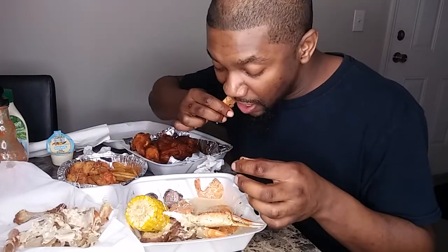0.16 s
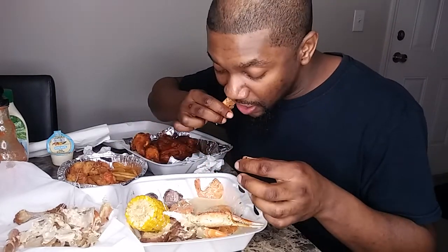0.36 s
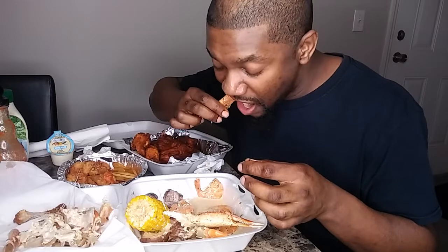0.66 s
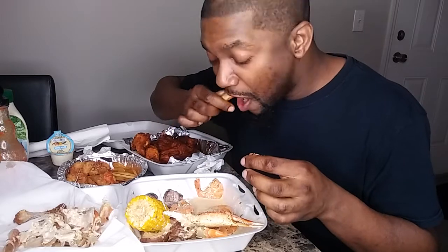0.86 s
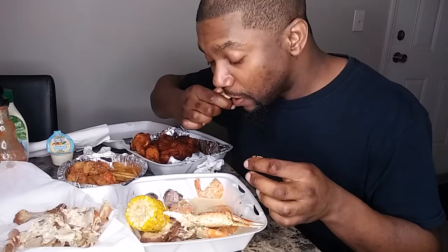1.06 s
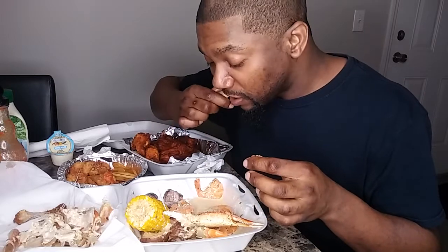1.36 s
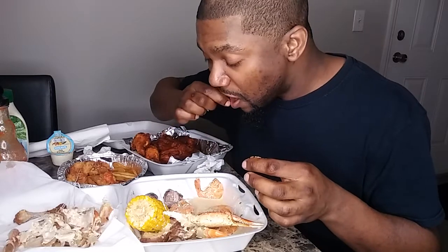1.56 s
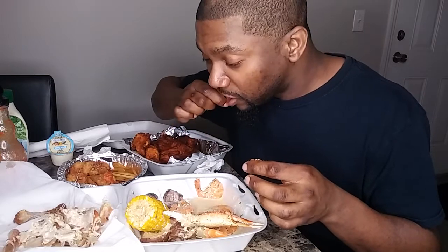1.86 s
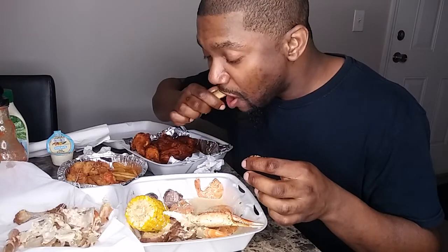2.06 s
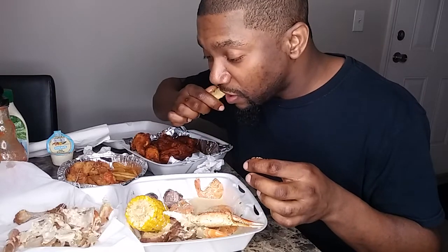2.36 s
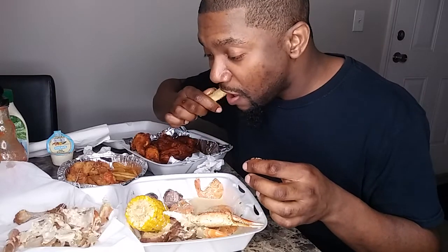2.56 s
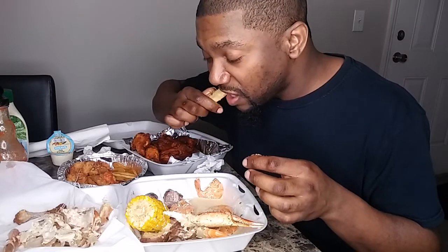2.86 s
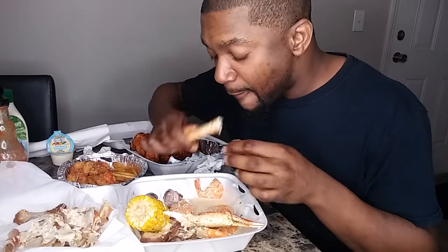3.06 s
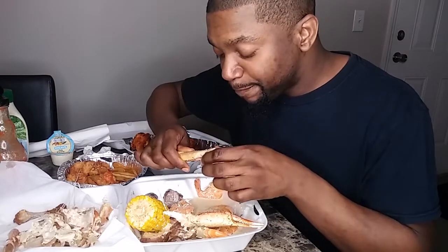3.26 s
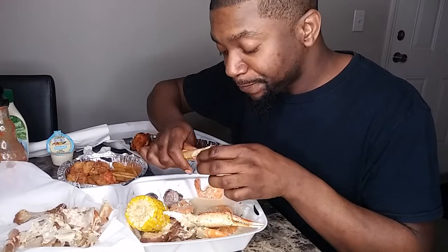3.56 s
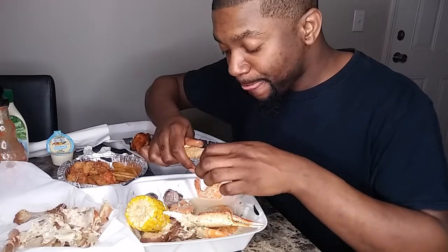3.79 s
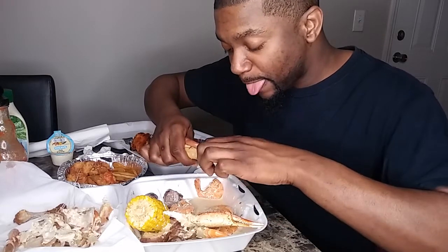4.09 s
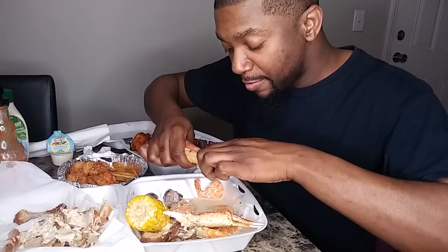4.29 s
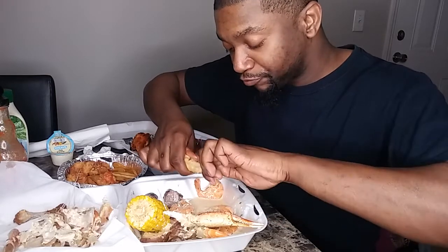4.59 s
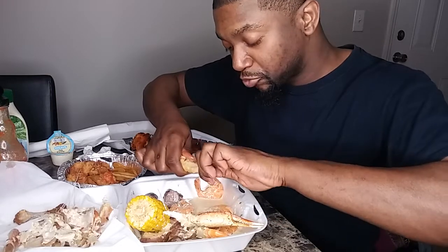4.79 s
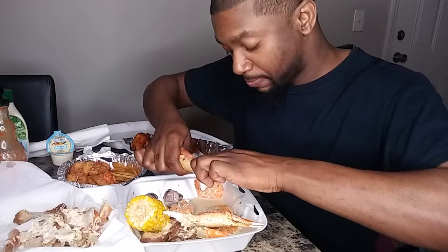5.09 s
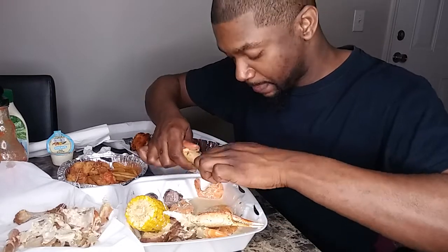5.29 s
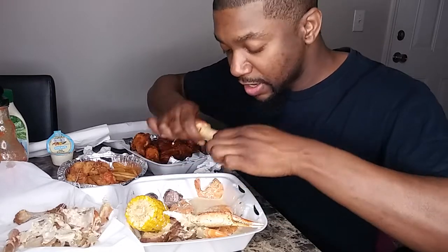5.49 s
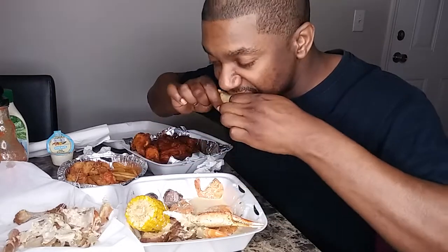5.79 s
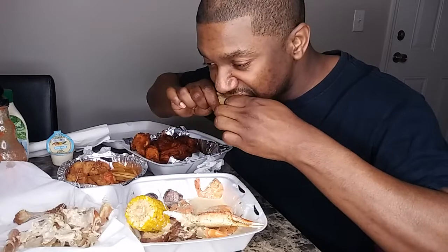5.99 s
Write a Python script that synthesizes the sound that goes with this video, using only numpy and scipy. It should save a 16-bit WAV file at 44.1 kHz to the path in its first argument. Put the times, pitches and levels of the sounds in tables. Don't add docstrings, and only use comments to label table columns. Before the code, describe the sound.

Close up in a hard-walled room, teeth tick on a crab leg, then a very loud crunch breaks its hard tip at half a second with wet pops. Sharp crackles follow after one second, near two and before three, then only faint finger clicks until small snaps near the end. Low rumble, hiss and a thin electrical whine stay behind.

```python
import sys
import numpy as np
from scipy import signal
from scipy.io import wavfile
from scipy.ndimage import uniform_filter1d

SR = 44100
rng = np.random.default_rng(int(sys.argv[2]) if len(sys.argv) > 2 else 0)


def volts_from_db(level):
    exponent = np.asarray(level, float) / 20
    return 10 ** exponent


def int16_out(signal):
    q = np.round(np.clip(np.atleast_2d(signal).T, -1, 1) * 32767)
    wavfile.write(sys.argv[1], SR, q.astype(np.int16))


N = 270774

# pitch_hz, level_db
DRONE_COLOUR = [(70, -53), (130, -4.5), (170, 0.45), (330, -3), (480, -10.5), (700, -25.5), (1500, -28.5),
                (4000, -37)]
# pitch_hz, level_db
DEEP_COLOUR = [(35, -24), (52, -48), (72, 2), (110, -7), (150, 0), (300, -54)]
# closest_s, half_length_s, drone_db, deep_db
TRAFFIC_PASSES = [
    (0.548, 0.54, -52, -63.5),
    (1.64, 0.25, -56.5, -60),
    (2.4, 0.32, -49.5, -53),
    (3.053, 0.39, -49, -60.5),
    (4.463, .2, -57, -60),
    (4.9, 0.52, -57, -55),
]
STILL_DRONE_DB, STILL_DEEP_DB = -57, -66
# pitch_hz, level_db
HISS_COLOUR = [(700, 3.4), (1500, 0), (3000, -5.5), (7500, -6.5), (8200, -11.5), (10000, -15.5),
               (15400, -8.5), (16500, -36)]
HISS_DB = -57.5
WHINE_HZ, WHINE_DB, WHINE_ON = 7710, -64, 0.69
MAINS_HZ, MAINS_START_S = 60, .0125

# delay_s, level_db
EARLY_ECHOES = [
    (.0021, -8.5),
    (.0036, -10),
    (.0062, -26),
    (0.0114, -9),
    (0.0108, -21),
    (.0138, -11),
    (.022, -11.5),
]
# pitch_hz, t60_s
ROOM_DECAY = [(500, 0.81), (1500, 0.41), (3000, 0.4), (5500, 0.4), (8000, 0.4), (13000, 0.3)]
# pitch_hz, level_db
ROOM_COLOUR = [(500, -1), (1500, 1.5), (3000, 4), (5500, 8), (7500, -1), (13000, 7)]

# start_s, mouth_hz, tube_hz, upper_tube_hz, wall_hz
GRIPS = [
    (0, 1507, 2470, 3840, 5550),
    (1.0, 1110, 2660, 3766, 5520),
    (1.75, 1214, 2500, 3510, 5420),
    (2.1, 1242, 2680, 3750, 5780),
    (2.7, 1315, 2530, 3670, 5930),
    (3.0, 1230, 2200, 3240, 5660),
    (4.5, 1290, 2230, 3040, 5500),
    (5.4, 1650, 2580, 3260, 5700),
    (6.0, 1910, 2670, 4000, 5700),
]
CAVITY_WIDTHS = [355, 410, 610, 980, 830]
UPPER_WALL_HZ, UPPER_TUBE_DB, TIP_UPPER_TUBE_DB = 7310, 7, 5
SCATTER = .022
# pitch_hz, width_hz, level_db
SPLINTER_MODES = [(10240, 1230, 7.5), (12130, 2900, 1.5), (13900, 530, -24)]
# pitch_hz, width_hz, level_db
SNAP_MODES = [(2020, 920, 0.83), (4800, 1500, 0.1)]
SNAP_DB, TIP_SNAP_DB = -10, -12.5

# start_s, wall_db, mouth_db, tube_db
BREAKS = [(.326, -16.5, -1.5, 0.5), (0.5341, 1, -7, 1), (.5412, -5, -18, -15), (0.5767, 9.5, -0.5, -10),
          (0.585, -3, -25, -5), (.59, -13, 8, -16), (1.2088, -20, -21, -7), (1.2223, -14.5, -19, -11),
          (1.2683, -7, -11, 0.5), (1.2873, -6, -22, -6), (1.3974, -2.5, -22, 0), (1.8778, -9, -37, -7),
          (2.02, -21, -13, -21), (2.2958, -14, -4, -7), (2.3662, -10, -3.5, -1), (2.8622, -14, -17, -6),
          (5.5277, -15, 4, 5.5), (6.098, -14.5, -9.5, -6)]
BREAK_FIZZ_DB, BREAK_TILT_DB = -12.5, -4
# start_s, wall_db, mouth_db, tube_db
SHATTERS = [
    (.401, -16.5, -12, -2.5),
    (0.4415, -5, -10.5, -2.5),
    (0.4562, -7, 3.5, 3.5),
    (1.1035, -24.5, -11, -3),
    (1.1981, -23, -22, -3),
    (1.9229, -21, -14, 3),
    (2.3214, -17.5, -8, 2),
    (2.3515, -4.5, -1.5, -4),
    (2.362, -19, -12, -19),
    (2.8421, -3.5, -7, -9),
]
SHATTER_FIZZ_DB, SHATTER_TILT_DB = -6.5, -2.2
# start_s, wall_db, mouth_db, tube_db
TICKS = [(0.0773, -40, 14, 6), (0.1516, -34.5, 2, 0), (0.3107, -31, -11, -1), (0.527, -39, -4, -3),
         (1.028, -32.5, 4, 2), (1.0884, -27.5, -12, -6), (1.52, -26.5, 1, 1), (1.5986, -32, 4, 0),
         (1.6329, -33.5, 6.5, 4), (1.8454, -34, -7, 7), (1.8505, -33, -5, 10.5), (2.0008, -38.5, 9, 21),
         (2.0242, -34.5, 8, 14.5), (2.1858, -31, 2, -3.5), (2.5052, -25, -20, 1), (2.595, -34, 3, 1),
         (2.7388, -30.5, -2, -3), (2.817, -27.5, -6, -1), (3.0336, -31, -20, -23), (3.214, -26, -0.5, -2.5),
         (3.2283, -29.5, 5, 0), (3.614, -43, 8, 8), (3.686, -42, 5, 6), (4.0903, -48.5, 21, 9),
         (4.2887, -30.5, -19, 3), (4.5594, -51, 1, 2), (4.6633, -42.5, -5, 17.5), (5.7145, -30, 5, 1),
         (5.7718, -30, -6, -0.5), (5.94, -32, -2, -3)]
TICK_FIZZ_DB, TICK_TILT_DB = -14.5, -5.5
# start_s, wall_db, mouth_db, tube_db, tilt_db
SPLITS = [(0.555, 7.5, -1.5, -3, 11), (1.111, -25.5, -7, -1.5, 0), (1.1774, -30, -22, -6, 16),
          (1.253, -2.5, -18, -5.5, 16), (1.278, -3, -11.5, -7, 27), (1.3678, -16, -7, -1, 0),
          (1.3913, 2.5, -21, -5, 14), (1.9132, -10, -17, -5.5, 3), (1.9342, -11, -8, -3, 24),
          (1.948, -24, -16, -14, 9), (1.955, -23, -8, -16, 5), (2.388, -11, -23, -10, 12),
          (6.062, -19.5, -18, -11, 25), (6.075, -40, -18, -17, 8)]
SPLIT_FIZZ_DB = -9.5

# start_s, pitch_hz, level_db
POPS = [(.578, 1486, 5), (.592, 1470, 0.5), (1.272, 1140, -21), (1.3, 910, -33), (1.525, 1030, -28),
        (1.605, 1070, -32), (1.64, 1030, -28), (1.925, 1133, -22.5), (1.975, 1270, -34), (2.19, 1005, -28),
        (2.598, 1134, -28), (2.725, 1250, -31.5), (2.765, 1300, -34), (2.8, 1310, -31)]
POP_WIDTH_HZ = 75
# start_s, peak_db
JAW_KNOCKS = [
    (0.5766, -29),
    (2.331, -22.5),
]
# pitch_hz, width_hz, level_db
JAW_MODES = [(440, 114, 8), (740, 140, -3.5), (970, 356, -2)]

BASS_CUT_HZ, SOFT_EDGE_HZ, LOUD_EDGE_HZ = 58, 15760, 16900
FULL_SCALE = .88


def evened(x):
    return x / np.sqrt(np.mean(x ** 2) + 1e-20)


def read(points, hz):
    f, value = np.transpose(points)
    return np.interp(np.log(hz + 1), np.log(f + 1), value)


def add(mix, s, sound):
    part = mix[round(s * SR):][:len(sound)]
    part += sound[:len(part)]


def high_pass(x, order, edge_hz):
    return signal.sosfilt(signal.butter(order, edge_hz, "high", fs=SR, output="sos"), x)


def low_pass(x, edge_hz):
    taps = signal.firwin(511, edge_hz, window=("kaiser", 9), fs=SR)
    return signal.oaconvolve(x, taps, "same")


def ring(drive, modes):
    t = np.arange(len(drive)) / SR
    body = np.zeros(len(t))
    for hz, width, db in modes:
        swell_and_die = t * np.exp(-1.55 * np.pi * width * t)
        body += volts_from_db(db) * width ** 2.76 * swell_and_die * np.sin(2 * np.pi * hz * t)
    out = signal.fftconvolve(drive, body)[:len(t)]
    return out / np.linalg.norm(out)


def haze(spectrum, patchy_db):
    hz = np.fft.rfftfreq(2048, 1 / SR)
    real, imaginary, patches = rng.standard_normal((N // 512 + 5, 1025, 3)).T
    patches = uniform_filter1d(patches, size=6, axis=0)
    patches = evened(uniform_filter1d(patches, size=8, axis=1))
    level_db = read(spectrum, hz)[:, None] + patchy_db * patches
    z = (real + 1j * imaginary) * volts_from_db(level_db)
    return evened(signal.istft(z, nperseg=2048, noverlap=1536)[1][:N])


def rumble():
    s, half, drone_db, deep_db = np.transpose(TRAFFIC_PASSES)
    near = np.exp(-((np.arange(N)[:, None] / SR - s) / half) ** 2)
    drone = np.sqrt(volts_from_db(2 * STILL_DRONE_DB) + near @ volts_from_db(2 * drone_db))
    deep = np.sqrt(volts_from_db(2 * STILL_DEEP_DB) + near @ volts_from_db(2 * deep_db))
    return drone * haze(DRONE_COLOUR, 1.64) + deep * haze(DEEP_COLOUR, 0.73)


def hiss():
    return volts_from_db(HISS_DB) * haze(HISS_COLOUR, 0.7)


def whine():
    t = np.arange(N) / SR
    cycle = (t - MAINS_START_S) * MAINS_HZ % 1
    waver_hz = 45 * evened(uniform_filter1d(rng.standard_normal(N), size=250))
    tone = np.sin(2 * np.pi * np.cumsum(WHINE_HZ + waver_hz) / SR)
    gate = uniform_filter1d(1. * (cycle < WHINE_ON), size=50)
    tick = volts_from_db(8.0) * np.exp(-cycle / 0.039) * np.diff(rng.standard_normal(N + 1))
    return volts_from_db(WHINE_DB) * (tone * gate + tick)


def room(x):
    taps = np.zeros(SR // 2)
    at = np.arange(200, len(taps) - 16, 16)
    taps[at + rng.integers(0, 16, len(at))] = rng.choice([-1., 1.], len(at))
    taps *= 1 - np.exp(-np.arange(len(taps)) / SR / 0.0025)
    hz, t, z = signal.stft(taps, SR, nperseg=256)
    fade_db = read(ROOM_COLOUR, hz)[:, None] - 60 * t / read(ROOM_DECAY, hz)[:, None]
    tail = signal.istft(z * volts_from_db(fade_db), SR, nperseg=256)[1]
    tail /= np.linalg.norm(tail)
    for s, db in EARLY_ECHOES:
        add(tail, s * rng.uniform(0.94, 1.03), volts_from_db(db) * rng.choice([-1., 1.], 1))
    return signal.fftconvolve(x, tail)[:N]


def jaw_knock(db):
    knock = ring(signal.unit_impulse(900), JAW_MODES)
    return volts_from_db(db) * knock / abs(knock).max()


def pop(hz, db):
    return volts_from_db(db) * ring(signal.unit_impulse(1800), [(hz, POP_WIDTH_HZ, 0)])


def fractures():
    rows = [(*row, BREAK_FIZZ_DB, BREAK_TILT_DB) for row in BREAKS]
    rows += [(*row, SHATTER_FIZZ_DB, SHATTER_TILT_DB) for row in SHATTERS]
    rows += [(*row, TICK_FIZZ_DB, TICK_TILT_DB) for row in TICKS]
    rows += [(*row, SPLIT_FIZZ_DB, tilt_db) for *row, tilt_db in SPLITS]
    return sorted(rows)


def crack(row, grain, detune):
    s, wall_db, mouth_db, tube_db, fizz_db, tilt_db = row
    _, *hz = [grip for grip in GRIPS if grip[0] <= s][-1]
    hz = np.array(hz + [UPPER_WALL_HZ]) * (1 + SCATTER * np.clip(detune, -1, 1))
    at_tip = s < GRIPS[1][0]
    upper = volts_from_db(TIP_UPPER_TUBE_DB if at_tip else UPPER_TUBE_DB)
    snap_level = volts_from_db(TIP_SNAP_DB if at_tip else SNAP_DB)

    fade = np.exp(-np.arange(len(grain)) / SR / 0.0018)
    snaps = signal.unit_impulse(len(grain)) + .14 * grain * fade
    cavities = [ring(snaps, [(f, width, 0)]) for f, width in zip(hz, CAVITY_WIDTHS)]
    mouth, tube, upper_tube, wall, upper_wall = cavities
    walls = (wall - volts_from_db(tilt_db) * upper_wall) / np.hypot(1, volts_from_db(tilt_db))
    tubes = (upper * upper_tube - tube) / np.hypot(1, upper)
    fizz = ring(snaps, SPLINTER_MODES)
    snap = ring(grain[::-1] * fade, SNAP_MODES)

    whole = walls + volts_from_db(mouth_db + 0.2) * mouth + volts_from_db(tube_db - 2.44) * tubes
    whole = volts_from_db(wall_db - 0.66) * (whole + volts_from_db(fizz_db) * fizz + snap_level * snap)
    return high_pass(whole, 2, 0.74 * hz[0])


def shell():
    paths = np.zeros((3, N))
    rows = fractures()
    grain = rng.standard_normal((len(rows), 700))
    detune = rng.standard_normal((len(rows), 5))
    for k, row in enumerate(rows):
        add(paths[k % 3], row[0], crack(row, grain[k], detune[k]))
    paths = high_pass(paths, 4, 850)
    for k, (s, hz, db) in enumerate(POPS):
        add(paths[k % 3], s, pop(hz, db))
    for s, db in JAW_KNOCKS:
        add(paths[0], s, jaw_knock(db))
    return paths.sum(0), sum(room(path) for path in paths)


def scene():
    direct, tail = shell()
    soft = tail + rumble() + hiss() + whine()
    return (direct + low_pass(soft, SOFT_EDGE_HZ))[None]


def top_cut(x):
    return signal.sosfilt(signal.butter(12, 16960, fs=SR, output="sos"), x)


def record(dry):
    heard = high_pass(dry[0], 6, BASS_CUT_HZ)
    clipped = np.clip(heard, -FULL_SCALE, FULL_SCALE)
    return top_cut(low_pass(clipped, LOUD_EDGE_HZ)[None])


dry = scene()
out = record(dry)
int16_out(out)
```